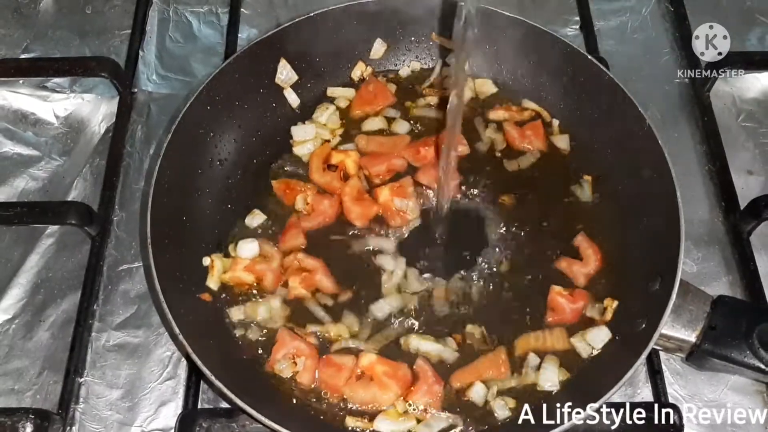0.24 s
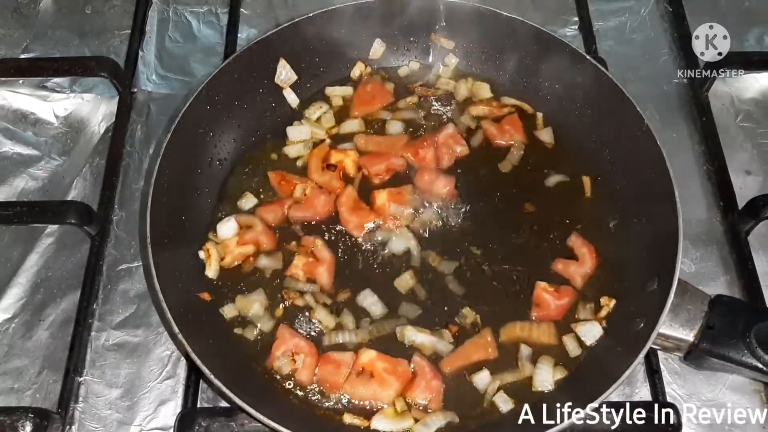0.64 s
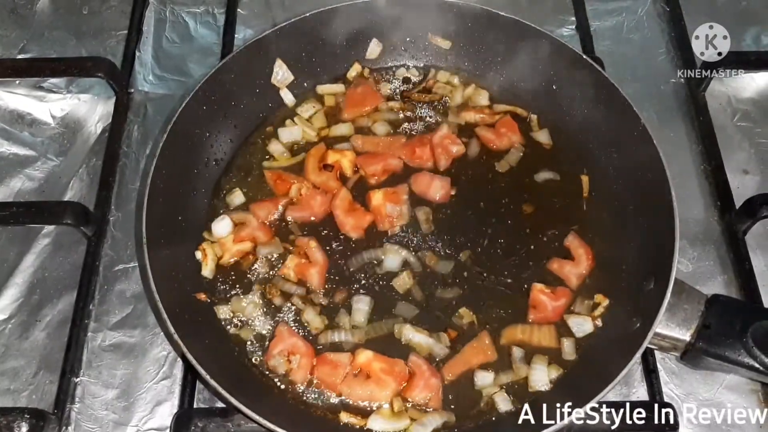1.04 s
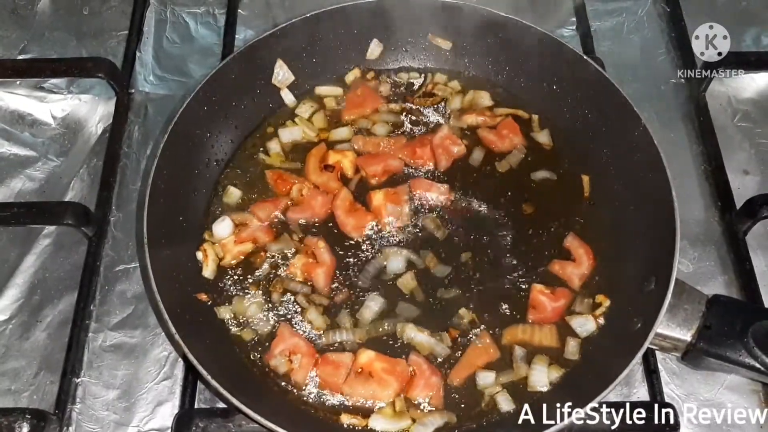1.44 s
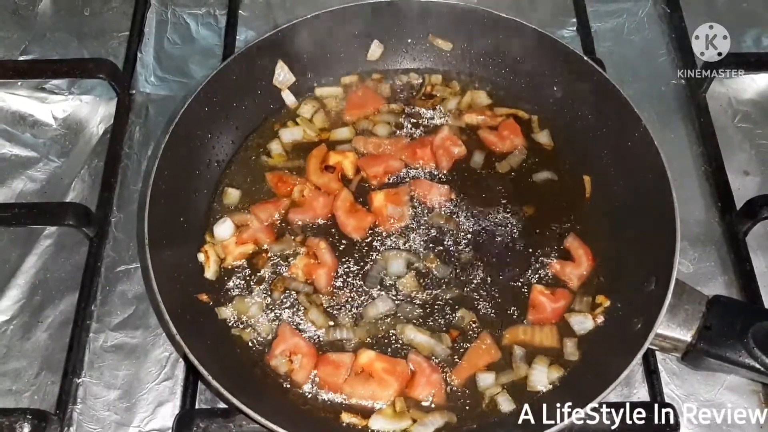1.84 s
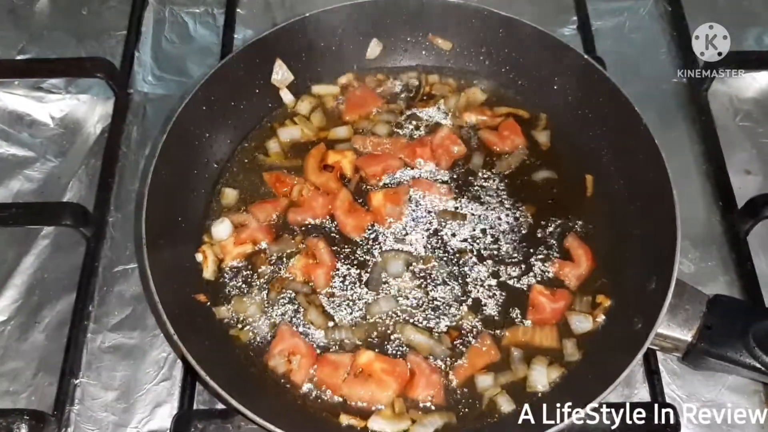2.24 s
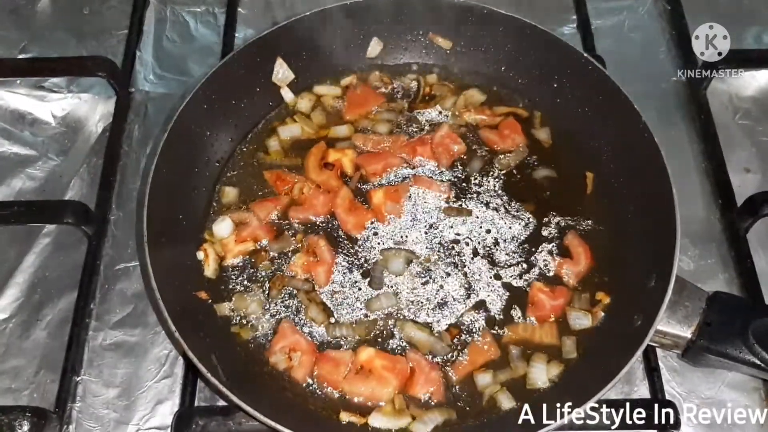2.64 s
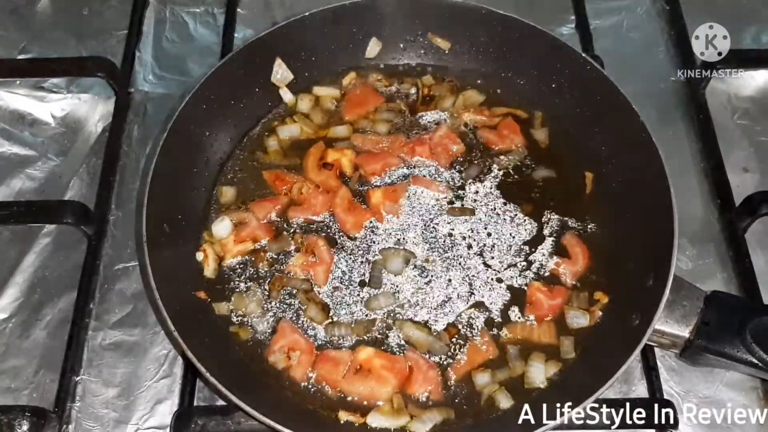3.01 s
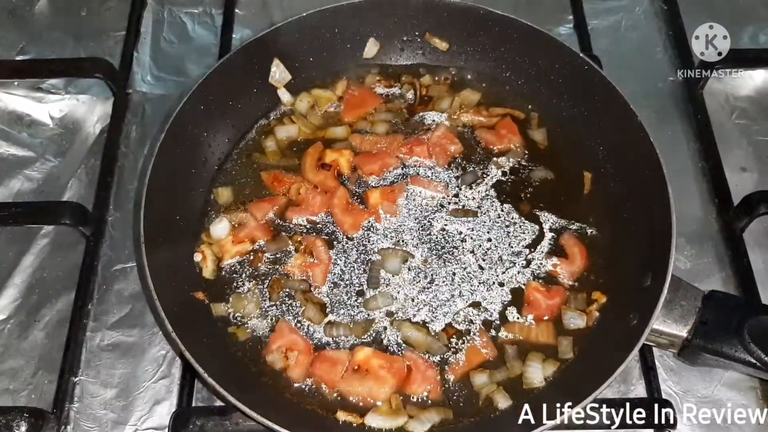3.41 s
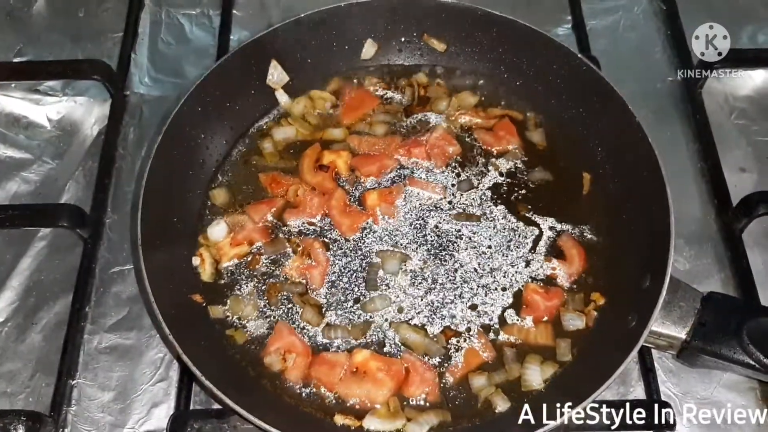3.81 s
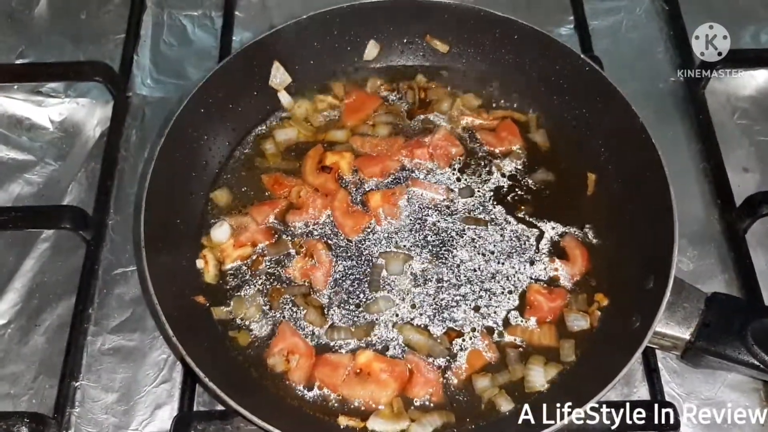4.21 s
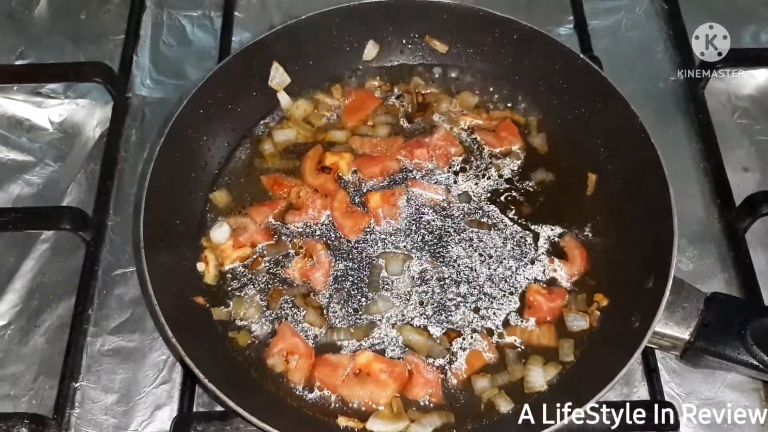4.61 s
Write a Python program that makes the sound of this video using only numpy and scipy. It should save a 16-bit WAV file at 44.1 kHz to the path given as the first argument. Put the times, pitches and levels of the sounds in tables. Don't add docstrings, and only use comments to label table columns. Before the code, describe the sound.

Continuous, dense wet sizzling from water in hot oil, very close and wide in stereo. Early loud snaps lean left, then the seething surges and thickens between about half a second and two seconds. Later it thins a little, letting crisp crackles and tiny whistling bubbles stand out. Soft jug knocks come just before and after three seconds. Low burner and room rumble sit beneath; the left microphone slightly overloads on bursts.

```python
import sys
import numpy as np
from scipy import signal
from scipy.fft import rfft, irfft, next_fast_len
from scipy.io import wavfile
from scipy.ndimage import uniform_filter1d, minimum_filter1d

SR = 44100
rng = np.random.default_rng(int(sys.argv[2]) if len(sys.argv) > 2 else 0)


def gain_from_db(level_db):
    decades = np.asarray(level_db, float) / 20
    return 10 ** decades


def wav_record(signal):
    frames = np.transpose(np.atleast_2d(signal))
    bounded = np.clip(frames, -1, 1)
    quanta = np.round(bounded * 32767).astype(np.int16)
    wavfile.write(sys.argv[1], SR, quanta)


N = 209916
SIZE = next_fast_len(N + SR)
HZ = np.arange(SIZE // 2 + 1) * SR / SIZE


def shape(hz, db):
    return gain_from_db(np.interp(np.log(HZ + 1), np.log(hz), db))


def through(x, response):
    return irfft(rfft(x, SIZE) * response, SIZE)[..., :N]


def unit(x):
    return x / np.sqrt(np.mean(x ** 2))


def steady(x):
    power = uniform_filter1d(uniform_filter1d(np.mean(x ** 2, 0), SR // 12), SR // 12)
    return x / np.sqrt(power)


def walk(rate):
    hold = int(SR / rate)
    steps = np.repeat(rng.standard_normal(N // hold + 1), hold)[:N]
    steps = uniform_filter1d(uniform_filter1d(steps, hold), hold)
    return unit(steps - uniform_filter1d(steps, 4 * hold))


def marks(seconds, gains):
    out = np.zeros(N)
    at = (np.asarray(seconds) * SR).astype(int)
    np.add.at(out, np.clip(at, 0, N - 1), gains)
    return out


def puff(decay_s, channels=2):
    t = np.arange(2048) / SR
    return rng.standard_normal((channels, len(t))) * np.exp(-t / decay_s)


def ports(x):
    # (frequency [Hz], left level [dB], right level [dB])
    colour = [(497, -23, -16.5), (950, -15.5, -15), (1523, -8, -5.5), (2550, -3, -3.5), (3550, -4.5, -8.5),
              (4490, -7.5, -6.5), (5800, -8.5, -9), (7980, -2, -7), (8460, -6.5, -13), (9160, -6, -14),
              (10140, -4, -8), (11650, -2, -3.5), (13900, -7, -2), (14600, -0.84, 1)]
    hz, left_db, right_db = np.transpose(colour)
    return through(x, np.array([shape(hz, left_db), shape(hz, right_db)]))


def bursts(rate, spread_db, seethe_db, seethe_rate):
    chance, luck, side = rng.random((3, N))
    size = gain_from_db(np.minimum(-spread_db * np.log(luck + 1e-9), 4 * spread_db))
    clicks = (chance < rate / SR) * np.sign(side - .5) * size
    return clicks * gain_from_db(seethe_db * walk(seethe_rate))


def patch(hz):
    spots = [bursts(rate=1500, spread_db=3.0, seethe_db=1.4, seethe_rate=32) for _ in range(7)]
    blows = steady(np.array(spots))
    paths = rfft(np.array([puff(0.00078) for _ in range(6)]), SIZE)
    paths = paths / np.sqrt(np.sum(np.abs(paths) ** 2, 0))
    octaves = np.log2((HZ + 1) / hz)
    pitch = np.cos(np.clip(octaves / 2, -1, 1) * np.pi / 2)
    heard = (rfft(blows[1:], SIZE)[:, None] * paths).sum(0)
    return through(blows[0], pitch), irfft(heard * pitch, SIZE)[:, :N]


def pan_ring(blows):
    # (pitch [Hz], width [Hz], left level [dB], right level [dB])
    resonances = [(986, 306, 6.5, 5.5), (1507, 97, 15.5, 7.5), (1769, 108, 8.5, -4.5),
                  (2044, 24, 15.5, -6.5), (3190, 158, 1.5, 4.5), (3520, 340, 0.5, -5.5),
                  (4350, 170, -9, -7), (2960, 166, -2, 2), (5054, 290, -9, -1.5), (5410, 230, 1.5, -4),
                  (6240, 510, -3, -6.5), (7230, 60, -10, 0.5), (7890, 160, -3, -14)]
    modes = []
    for hz, width, left_db, right_db in resonances:
        damping = 1j * HZ * width
        gain = gain_from_db(np.array([[left_db], [right_db]]))
        modes.append(gain * damping / (hz * hz - HZ ** 2 + damping))
    ring = 0
    for sign, group in ((1, modes[::2]), (-0.89, modes[1::2])):
        struck = blows * gain_from_db(1.1 * walk(6))
        ring = ring + sign * through(struck, sum(group))
    return ring


def sizzle(left_db, right_db, coarse_db):
    split_hz = 4090
    patches = [patch(hz) for hz in (900, 3600, 14400)]
    blows, air = (sum(part) for part in zip(*patches))
    surge = gain_from_db(0.86 * walk(18) + 0.92 * walk(60))
    sound = ports(air + pan_ring(blows)) * surge
    low = 1 / np.sqrt(1 + (HZ / split_hz) ** 12)
    coarse = through(sound, low)
    fine = through(sound, np.sqrt(1 - low ** 2))
    left = steady(fine[:1])[0] * gain_from_db(left_db + 3.0)
    right = steady(fine[1:])[0] * gain_from_db(right_db + 2.5)
    return np.array([left, right]) + steady(coarse) * gain_from_db(coarse_db + 1.0)


def overload(db):
    dips = np.abs(bursts(rate=900, spread_db=3.5, seethe_db=0.5, seethe_rate=8.3))
    dips = through(dips - uniform_filter1d(dips, SR // 20), np.exp(-(HZ / 1200) ** 2))
    return -unit(dips) * gain_from_db(db + 4.0) * np.array([[1], [.01]])


def kitchen():
    # (frequency [Hz], level per hertz [dB])
    rumble = [(30, -13), (65, 9), (130, -4.5), (270, 1.5), (500, -9.5), (900, 3), (2000, -46)]
    level_db, pan_db, fade_db_s, shared = -49, 3, -1.3, .9
    noise = through(rng.standard_normal((2, N)), shape(*np.transpose(rumble)))
    mid, side = noise * gain_from_db(1.5 * walk(8) + fade_db_s * np.arange(N) / SR)
    room = unit(np.array([mid + shared * side, mid - shared * side]))
    return gain_from_db(level_db + np.array([[.5], [-.5]]) * pan_db) * room


def small_pops(count):
    level_db, spread_db = -22, 2.5
    s = rng.random(count) * N / SR
    return np.column_stack([s, level_db + spread_db * rng.standard_normal((count, 2))])


def pops():
    # (time [s], left peak [dB], right peak [dB])
    cracks = [(0.0532, -7, -8), (0.1203, -3, -9), (0.1692, -10, -10), (0.1849, -7, -14), (0.2305, 6, -13),
              (0.2436, -7, -13), (0.3397, -12, -13), (0.8523, -15, -13), (1.1849, -4, -21.5),
              (1.2014, -9, -12), (1.5673, -12, -15), (1.6495, -5, -9), (1.6827, -17, -7), (2.0602, -9, -11),
              (2.0707, -7, -7), (2.1915, -1, -12), (2.2597, -6, -13), (2.3044, -5, -13),
              (2.4863, -14.5, -17), (2.6761, 0.5, 1), (2.7378, -2, -14), (2.8284, -10, -11),
              (2.9179, -11, -11), (2.9524, -10, -15), (3.0976, -11, -7), (3.1635, -13, -15),
              (3.1695, -9, -14), (3.1971, -12, -16), (3.2441, -9, -8), (3.2484, -14, -15),
              (3.328, -13, -13), (3.3642, -2, -13), (3.4095, -11, -17), (3.4355, -8, -10),
              (3.4584, -13, -9), (3.4977, -7.5, -15), (3.511, -11, -18), (3.544, -17, -30.5),
              (3.6187, -13, -11), (3.6405, -11, -5), (3.649, -19, -4), (3.7465, -11, -14), (3.7513, -5, -7),
              (3.7709, -16, -16), (3.8437, -5, -13.5), (3.8748, -8, -10), (3.9356, -6, -1),
              (3.9513, -5, -10), (4.0183, -9, -15), (4.1265, -16, -13), (4.1821, -5, -16),
              (4.3457, -14, -13), (4.4044, -3, -6), (4.4227, -13, -13), (4.4515, -17, -12),
              (4.4621, -11, -7), (4.4679, -16, -21), (4.5134, -12, -21), (4.5631, -7, -7),
              (4.7162, -18, -14),
              (0.0217, -16, -15), (0.0282, -8, -11), (0.1273, -10, -10), (0.1545, -10, -11),
             (0.2623, -15, -12), (0.2705, -5, -11), (0.4184, -2, -17), (0.429, -4, -14), (0.5547, -10, -10),
             (0.624, -10, -11), (0.6454, -8, -9), (0.919, -3, -2), (0.9335, -7, -4), (1.0725, -8, -9),
             (1.0887, -1, -18), (1.2698, -10, -12), (1.3, -11, -19), (1.3327, -17, -10), (1.5151, -11, -23),
             (1.5507, -9, -23), (2.0636, -16, -9), (2.1569, -7, -22), (2.1699, -11, -12.5),
             (2.3154, -15, -4), (2.5353, -5, -6), (2.5818, -16, -18), (2.643, -9, -17), (2.7421, -21, -6),
             (2.8224, -9, -7), (2.9302, -5, -18), (2.9339, -17, -6), (2.9457, -8, -10), (3.0259, -21, -21),
             (3.0437, -12, -13), (3.128, -10, -19), (3.2972, -19, -31), (3.3748, -16, -13),
             (3.383, -21, -12), (3.4435, -12, -13), (3.5475, -25, -6), (3.5523, -11, -28),
             (3.8802, -6, -13), (3.9843, -13, -18), (3.9886, -14, -10), (4.0031, -16, -9),
             (4.0218, -22, -8), (4.1055, -9, -14), (4.1733, -11, -10), (4.2271, -21, -15),
             (4.2797, -13, -9), (4.2955, -17, -11), (4.3492, -16, -9), (4.3594, -27, -21),
             (4.4864, -16, -13), (4.5369, -13, -17), (4.569, -7.5, -20), (4.6271, -18, -12),
             (4.6936, -27, -18), (4.7127, -15, -18), (4.7393, -23, -18)]
    crack_hz = 1500
    s, left_db, right_db = np.vstack([cracks, small_pops(count=60)]).T
    t = np.arange(2048) / SR
    fade = np.exp(-t / .0003) + gain_from_db(-11) * np.exp(-t / .0025)
    hits = np.array([marks(s - .0003, gain_from_db(left_db)), marks(s - .0003, gain_from_db(right_db))])
    splinters = np.sign(rng.standard_normal((2, N)))
    noise = through(hits, rfft(fade, SIZE)) * splinters
    bright = HZ ** 2 / (HZ ** 2 + crack_hz ** 2)
    return gain_from_db(1.9) * through(ports(noise), bright)


def spits():
    # (time [s], dip [dB], dullness [0-1])
    spit_list = [(0.0372, -21, 0.0), (0.1688, -20, 0.0), (0.2436, -29, 0.2), (0.3539, -25, 0.0),
                 (0.3991, -17, 0.3), (0.6454, -19, 0.4), (0.6726, -13, 0.9), (0.7513, -13.5, 0),
                 (0.7696, -13, 0.8), (0.9097, -18, 0.2), (0.9242, -18, 0.1), (0.965, -11, 0.3),
                 (1.0005, -11, 0.4), (1.046, -21, 0.1), (1.06, -16, 0.2), (1.0986, -15, 0.0),
                 (1.1083, -8.5, 0.9), (1.1424, -15.5, 0.0), (1.1791, -14, 0.4), (1.2421, -11.5, 0.0),
                 (1.245, -15, 0.0), (1.2695, -15, 0.3), (1.4001, -23, 0.1), (1.515, -5, 0.4),
                 (1.5672, -16, 0.3), (1.5721, -17, 0.6), (1.5826, -14.5, 0.4), (1.6495, -14, 0.2),
                 (1.6826, -14, 0.4), (1.689, -14, 0.5), (1.7139, -17, 1.0), (1.8982, -17, 0.1),
                 (2.0975, -21, 0.4), (2.1691, -22, 0.2), (2.1963, -22, 0.2), (2.2009, -23, 0.0),
                 (2.2595, -10.5, 0.9), (2.5816, -23, 0.3), (2.6425, -22, 0.3), (2.6481, -18, 0.0),
                 (2.6755, -12.5, 0.1), (2.7378, -19, 0.3), (2.9937, -20, 0.4), (3.1971, -25, 0.0),
                 (3.2448, -13.5, 0.5), (3.2483, -26, 0.2), (3.3744, -19, 0.0), (3.7462, -18, 0.0),
                 (3.751, -29, 0.0), (3.9513, -24, 0.2), (4.0179, -18, 1.0), (4.0914, -22, 0.2),
                 (4.126, -23, 0), (4.1592, -24, 0.0), (4.2954, -24, 0.0), (4.4042, -21, 0.1),
                 (4.4226, -26, 0.0), (4.5007, -28, 0.2), (4.5913, -31, 0.0), (4.6107, -15.5, 0.9),
                 (0.2287, -20, 0.5), (0.271, -27, 0.0), (0.2744, -20, 0.1), (0.358, -12, 1.0), (0.367, -21, 0.1),
            (0.4288, -18, 0.3), (0.4345, -24, 0.0), (0.438, -18, 0.8), (0.631, -20, 0.5),
            (0.6386, -17, 0.9), (0.656, -15, 1.0), (0.7156, -21, 0.0), (0.76, -24, 0.4), (0.776, -23, 0.8),
            (0.7974, -22, 0.0), (0.933, -19, 0.0), (0.9466, -15, 0.9), (1.2002, -16, 0.0),
            (1.2375, -25, 0.0), (1.3547, -21, 0.2), (1.4102, -20, 0.0), (1.561, -19, 1.0),
            (1.6002, -18, 0.1), (1.721, -19, 0.5), (1.8175, -24.5, 0.1), (2.1737, -29, 0.1),
            (2.228, -26, 0.6), (2.304, -28, 0.3), (2.3389, -25, 0.0), (2.343, -23, 0.5), (2.3963, -21, 0.0),
            (2.4154, -22, 0.2), (2.487, -21, 0.0), (2.5337, -24, 0.0), (2.6109, -23, 0.1),
            (2.6377, -34, 0.0), (2.654, -22, 0.3), (2.826, -35, 0.0), (2.8308, -20, 0.1), (2.835, -24, 0.2),
            (2.918, -26, 0.6), (2.9347, -23, 0.5), (2.9526, -19, 0.0), (3.0597, -35, 0.0),
            (3.0968, -17, 1.0), (3.119, -27, 0.0), (3.3639, -23, 0.2), (3.3824, -24, 0.0),
            (3.4093, -22, 0.0), (3.53, -23, 0.1), (3.642, -31, 0.4), (3.7708, -32, 0.0), (3.7969, -26, 0.0),
            (3.8435, -28, 0.0), (3.8799, -36, 0.0), (3.9354, -39, 0.0), (4.1819, -32, 0.0),
            (4.4103, -27, 0.0), (4.5689, -23, 0.8), (4.7532, -25, 0.0)]
    sharp_hz, dull_hz = 1900, 685
    s, dip_db, dull = np.array(spit_list).T
    dull = np.clip(dull, 0, 1)
    dips = 0
    for share, hz in ((1 - dull, sharp_hz), (dull, dull_hz)):
        clicks = marks(s, share * gain_from_db(dip_db + 24.5))
        dips = dips + through(clicks, np.exp(-(HZ / hz) ** 2))
    return -dips * np.array([[1], [0]])


def small_bubbles(count):
    middle_hz, spread_octaves, level_db, spread_db = 1450, 0.28, -18, -1.5
    s = rng.random(count) * N / SR + 0.00202
    pitch, size = rng.standard_normal((2, count))
    return np.column_stack([s, middle_hz * 2 ** (spread_octaves * pitch), level_db + spread_db * size])


def bubbles():
    # (time [s], pitch [Hz], peak [dB])
    bubble_list = [(0.2705, 3020, -20.5), (0.5674, 2220, -9), (0.5715, 1440, -9), (0.5907, 2930, -11),
                   (0.732, 1660, -10), (0.7336, 3020, -5), (0.7684, 3000, -11), (0.894, 1460, -9),
                   (0.9194, 3220, -15), (0.9343, 2980, -9), (1.46, 3057, -16), (1.8187, 1650, -10.5),
                   (2.1449, 1750, -9.5), (2.5056, 3300, -15), (2.5584, 1630, -12), (2.6243, 3000, -12),
                   (2.724, 1800, -13.5), (2.761, 2950, -10), (2.7825, 1910, -8), (2.952, 1790, -9),
                   (3.2435, 3320, -8), (3.3927, 1450, -8.5), (3.4583, 3050, -11), (3.5527, 3400, -10),
                   (3.591, 1220, -14), (3.7082, 3300, -9.5), (3.7203, 1090, -14.5), (3.8741, 3200, -6),
                   (3.984, 3340, -7.5), (4.3455, 3300, -8), (4.592, 1040, -13), (4.7545, 1400, -8.5),
                   (4.6245, 1700, -11), (4.682, 2150, -21.5),
                   (0.0382, 1710, -22), (0.121, 1650, -12), (0.1215, 3300, -10), (0.1707, 3590, -11),
              (0.4382, 1630, -10), (0.522, 3220, -9), (0.5805, 1500, -9), (0.6466, 1680, -18),
              (0.6799, 3300, -15), (0.827, 3240, -15), (0.9139, 3270, -13), (0.9267, 3350, -6),
              (1.002, 1670, -17), (1.063, 1560, -15), (1.1255, 1710, -19), (1.1873, 1680, -10),
              (1.3326, 3170, -12), (1.4118, 1560, -14), (1.6273, 3260, -16), (1.6366, 1610, -17),
              (1.8135, 1580, -14), (1.862, 3190, -18), (1.876, 1740, -13), (1.9323, 3370, -16),
              (1.9478, 1720, -14), (1.962, 1670, -14), (2.2147, 1540, -13), (2.3364, 3220, -14),
              (2.424, 1660, -19), (2.501, 1740, -15), (2.511, 1710, -12), (2.537, 1630, -10),
              (2.6775, 3140, -12), (2.7139, 3420, -13), (2.8212, 3100, -12.5), (2.8296, 1610, -16),
              (3.058, 1630, -17), (3.1645, 1680, -15), (3.171, 1570, -10.5), (3.1711, 3170, -10),
              (3.236, 3330, -17), (3.2496, 1760, -11), (3.4928, 1680, -11), (3.5649, 1500, -16),
              (3.6069, 1400, -12), (3.6195, 3290, -16), (3.68, 1610, -16), (3.7473, 1650, -15),
              (4.1271, 1610, -11), (4.1513, 1780, -12), (4.1675, 3230, -11), (4.1863, 1610, -14),
              (4.2156, 1690, -15), (4.2168, 2960, -11), (4.2649, 3540, -13), (4.2677, 1580, -14),
              (4.4531, 1600, -11), (4.5639, 3330, -11), (4.5994, 3340, -15), (4.712, 3220, -9.5)]
    out = np.zeros((2, N + 2048))
    t = np.arange(1024) / SR
    swell = t / 0.0024 * np.exp(1 - t / 0.001)
    for s, hz, db in np.vstack([bubble_list, small_bubbles(count=12)]):
        lag, pan = rng.standard_normal(2)
        late = t + np.array([[1], [-1]]) * .00004 * lag
        note = np.sin(2 * np.pi * hz * late * (0.929 + 22.0 * late)) * swell
        at = int((s - .002) * SR)
        out[:, at:at + len(t)] += gain_from_db(db - 3.5 + np.array([[1.5], [-1.5]]) * (pan + 1.0)) * note
    return out[:, :N]


def knocks():
    # (time [s], peak [dB], left minus right [dB], thud [dB], hardness [dB per octave])
    touches = [
        (2.807, -25, -2, -39, 3.5),
        (2.8148, -27, -1, -56, 3),
        (2.8285, -28, -11, -60, -5),
        (3.109, -30, -8, -44, -8),
        (3.387, -30, -3, -57, -8),
    ]
    # (pitch [Hz], level [dB], time to fade by 60 dB [s])
    jug = [(530, -22, 0.06), (643, -12, 0.067), (907, -5, 0.05), (980, 5, 0.029), (1250, 2, .025),
           (1500, -6, 0.046), (2340, 4, 0.03), (2210, 3, 0.03), (3270, -18, 0.03)]
    jug_lag = 19
    out = np.zeros((2, N + SR))
    t = np.arange(SR // 4) / SR
    low_band = signal.butter(2, [60, 170], "band", fs=SR, output="sos")
    for s, db, pan_db, thud_db, hard_db in touches:
        air = rng.standard_normal((2, len(t)))
        ring = np.zeros(len(t))
        for hz, level_db, t60 in jug:
            level = gain_from_db(level_db + hard_db * np.log2(hz / 900))
            ring += level * np.sin(2 * np.pi * hz * t) * 1000. ** (-t / t60)
        echo = signal.fftconvolve(air * np.exp(-t / .018), ring[None], axes=1)[:, :len(t)]
        ring = ring + gain_from_db(-16) * echo
        ring[0] = np.pad(ring[0], (jug_lag, 0))[:len(t)]
        thud = unit(signal.sosfilt(low_band, air[0]))
        thud = thud * np.exp(-t / 0.097) * np.minimum(t / 0.05, 1)
        level = gain_from_db(db - 11.0 + np.array([[pan_db], [-pan_db]]) / 2)
        at = int(s * SR)
        out[:, at:at + len(t)] += level * ring + gain_from_db(thud_db) * thud
    return out[:, :N]


def scene():
    # (time [s], level [dB])
    boil = [(0.0, -25), (0.09, -27), (0.77, -23.5), (0.78, -27.5), (0.83, -23.5), (1.52, -27.5),
            (1.64, -22), (1.67, -25.5), (1.86, -24), (1.97, -26.5), (3.63, -27.5), (3.74, -31), (3.75, -24),
            (3.8, -29), (4.02, -26), (4.04, -29), (4.43, -28.5), (4.76, -30)]
    vigour = np.interp(np.arange(N) / SR, *np.transpose(boil)) + 26
    left_db = -23.5 + vigour + 0.34 * walk(9)
    right_db = -20.5 + vigour + 0.34 * walk(9)
    coarse_db = -31 + 0.51 * vigour + 0.58 * walk(9)
    overload_db = -46 + 1.42 * vigour + 3 * walk(9)
    pan = sizzle(left_db, right_db, coarse_db) + overload(overload_db)
    return pan + kitchen() + pops() + spits() + bubbles() + knocks()


def thin_out(x):
    low_hz, high_hz, top_hz = 3600, 10000, 15480
    sag_db = -4.7
    blocks = dict(fs=SR, window="cosine", nperseg=2048)
    hz, _, cells = signal.stft(x, **blocks)
    hz = hz[:-1, None]
    power = np.abs(cells[:, :-1]) ** 2
    band = power.reshape(2, -1, 4, power.shape[-1]).mean(2)
    band = np.repeat(band, 4, axis=1)
    near = uniform_filter1d(power, size=81, axis=1)
    usual = np.sqrt(band.mean(2, keepdims=True) / near.mean(2, keepdims=True))
    kept = band > near * usual * gain_from_db(2 * sag_db)
    kept = kept | (hz < low_hz) | (hz > high_hz)
    kept = minimum_filter1d(kept, size=3, axis=2)
    cells[:, :-1] *= kept & (hz < top_hz)
    return signal.istft(cells, **blocks)[1][:, :N]


def roll_off(x):
    return signal.sosfilt(signal.butter(12, 16840, fs=SR, output="sos"), x)


def record(dry):
    ceiling = .8
    bent = dry - np.array([[.2], [.03]]) * dry ** 2
    bent = ceiling * np.tanh(bent / ceiling)
    bent = signal.sosfilt(signal.butter(1, 90, "high", fs=SR, output="sos"), bent)
    bent = signal.sosfilt(signal.butter(2, 45, "high", fs=SR, output="sos"), bent)
    turn = np.array([[1, 1], [1, -1.066]]) / np.sqrt(2)
    mix = turn @ thin_out(turn @ bent)
    return roll_off(mix)


dry = scene()
out = record(dry)
wav_record(out)
```